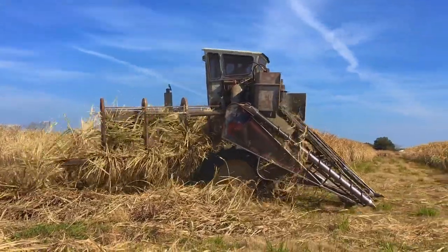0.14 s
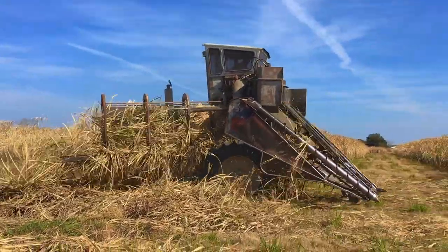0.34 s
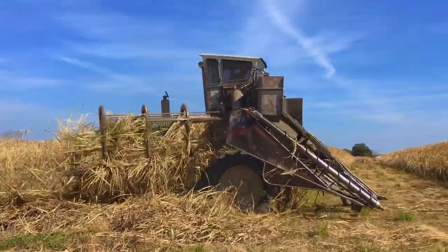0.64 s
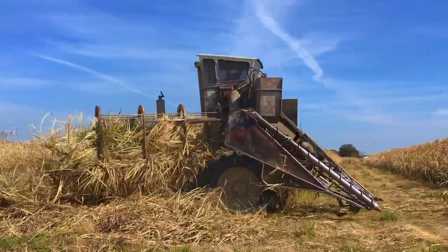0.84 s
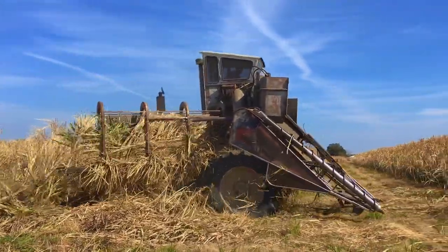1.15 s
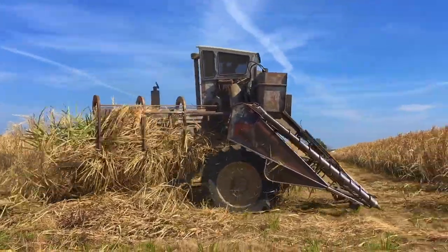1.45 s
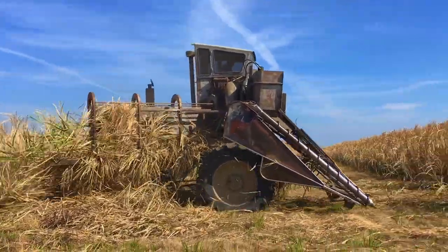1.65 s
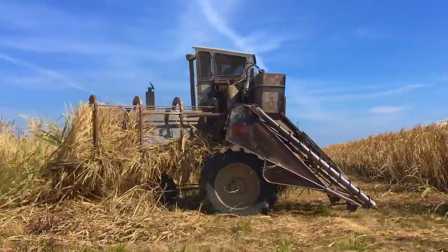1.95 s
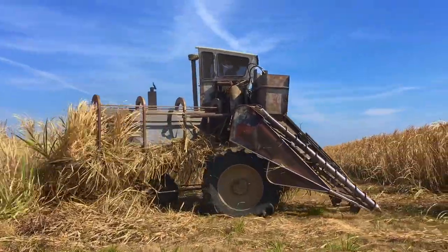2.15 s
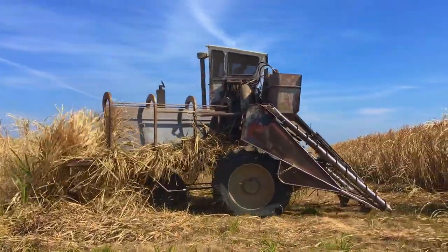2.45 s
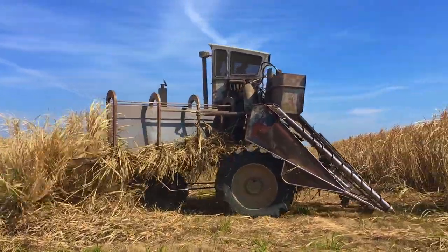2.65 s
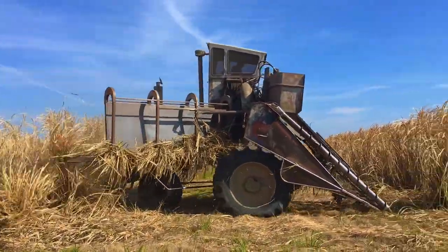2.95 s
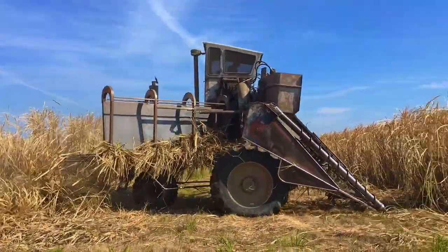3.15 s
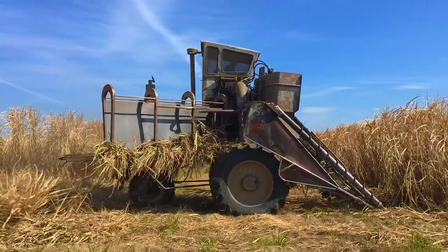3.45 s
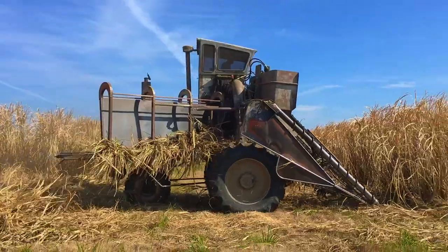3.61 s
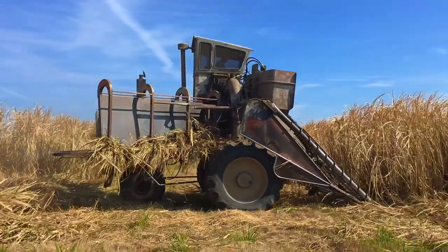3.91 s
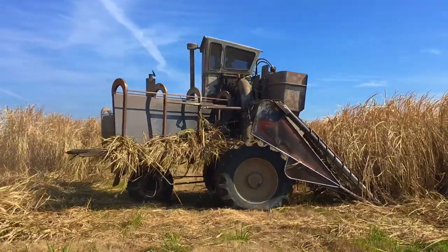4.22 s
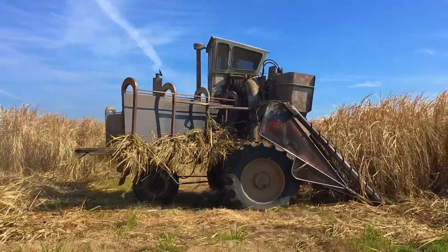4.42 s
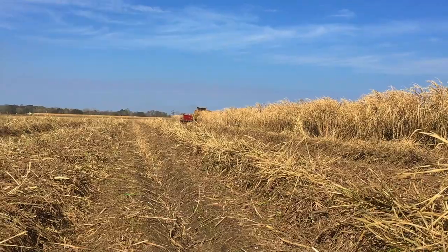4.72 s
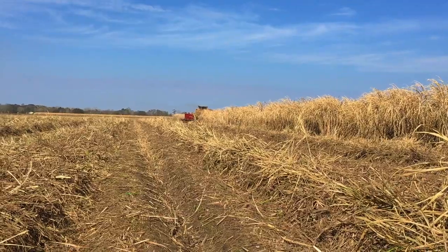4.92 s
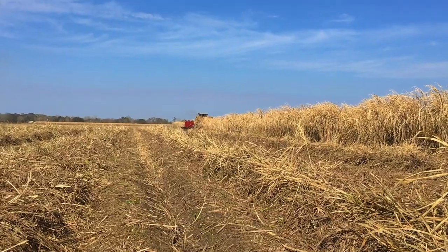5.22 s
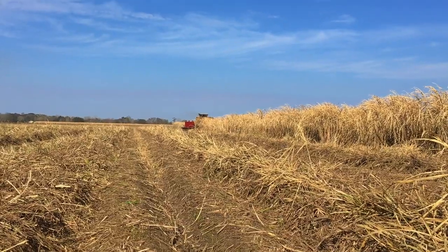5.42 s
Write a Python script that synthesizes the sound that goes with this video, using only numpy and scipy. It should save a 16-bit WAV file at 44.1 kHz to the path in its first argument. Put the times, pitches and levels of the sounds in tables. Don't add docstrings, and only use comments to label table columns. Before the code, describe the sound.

A diesel harvester drones and clatters close by, chains squeaking and slats knocking as dry stalks crush, then abruptly a faint distant machine with wind.

```python
import sys
import numpy as np
from scipy import signal
from scipy.fft import rfft, irfft, next_fast_len
from scipy.io import wavfile
from scipy.ndimage import uniform_filter1d, map_coordinates

SR = 44100
rng = np.random.default_rng(int(sys.argv[2]) if len(sys.argv) > 2 else 0)


def to_wav(s):
    ch = np.atleast_2d(s).T
    pcm = np.round(np.clip(ch, -1, 1) * 32767)
    wavfile.write(sys.argv[1], SR, pcm.astype(np.int16))


def field_ratio(decibels):
    return 10 ** (np.asarray(decibels, dtype=float) / 20)


N = 245637
T = np.arange(N) / SR

CUT_S, RETURN_S, FADE_S = 4.629, 4.663, .014
TOP_HZ = 15740
CYCLE_HZ, FAR_CYCLE_HZ = 16.39, 16.13

# order_per_cycle, level_db
ENGINE_LINES = [(2.46, -48), (4, -41), (16, -49), (18, -48), (22, -45), (24, -44), (44, -54), (48, -53),
                (51, -48), (54, -49.5), (55, -50), (57, -52), (63, -52), (66, -47.5), (99, -54)]
FAR_ENGINE_LINES = [(6, -52), (12, -55), (24, -69), (36, -70), (42, -68), (60, -62), (87.7, -60)]

# pitch_hz, density_db
RUMBLE_COLOUR = [(13, -45), (22, -22), (48, -9.5), (71, -8), (91, -7), (145, 2), (183, -6), (230, -17.5),
                 (300, -43), (510, -120)]
# pitch_hz, density_db
PANEL_COLOUR = [(120, -28), (205, -5.5), (242, -1), (376, -4), (466, -18.5), (520, -17), (680, -39),
                (1140, -120)]
# pitch_hz, density_db
CLATTER_COLOUR = [(250, -9.5), (430, -7), (486, -17.5), (578, -4.5), (753, -3.5), (904, 0.5), (1140, -3),
                  (1430, -4), (1520, -3.5), (2330, -10), (2550, -9.5), (3040, -16.5), (4900, -19),
                  (6370, -21), (10800, -120)]
# pitch_hz, density_db
CROP_COLOUR = [(2180, -3.5), (3700, -1), (4900, -5), (5740, 0), (6490, -1.5), (8480, -1), (9580, -3),
               (10500, -8.5), (12800, -7.5), (15100, -16), (15900, -11)]
# pitch_hz, density_db
WIND_COLOUR = [(13, -39), (22, -12), (32, 1), (54, -1), (161, -11.5), (170, -12), (220, -34), (370, -120)]
# pitch_hz, density_db
FAR_RUMBLE_COLOUR = [(65, -30), (110, -7), (140, -11.5), (199, -2), (290, -15), (376, -14), (520, -24),
                     (680, -55), (1140, -120)]
FAR_CLATTER_COLOUR = [(250, -48), (430, -24), (530, -20), (564, -14), (717, -8.5), (940, -2.5), (1340, -4),
                      (1440, -3), (1490, -3), (1910, -1), (2480, -9.5), (2990, -5.5), (3390, -12),
                      (3720, -6.5), (5200, -29), (6760, -53), (11400, -120)]
FAR_CROP_COLOUR = [(2650, -25), (4500, -1), (5050, -4), (5830, -0.5), (7350, -8), (8750, -7),
                   (10400, -16.5), (11700, -16.5), (15900, -28)]

# time_s, level_db
EXHAUST_REVEAL = [
    (0, -31.5),
    (1.1, -30.5),
    (2.0, -31.5),
    (2.6, -28),
    (3.4, -26),
    (4.2, -23.5),
    (4.63, -25),
]
# time_s, pitch_hz, level_db
DRIVE_WHINE = [
    (0, 1413, -42),
    (.3, 1385, -40),
    (.7, 1354, -40),
    (1, 1360, -49),
]
# centre_s, change_db, half_width_s
OCTAVE_SWELLS = [
    (0, 5, 0.79),
    (1.4, 4, 0.27),
    (3.4, -7, 0.25),
    (4.2, 4, 0.27),
]
# centre_s, change_db, half_width_s
GEAR_SWELLS = [
    (.7, 3, 0.43),
    (1.35, 7.5, .2),
    (1.8, -7, .2),
    (2.2, 6, .2),
    (3.1, 6, 0.46),
    (4.2, 12, 0.35),
]
# centre_s, change_db, half_width_s
PUMP_SWELLS = [
    (1.0, 11, 0.19),
    (1.7, -7, 0.39),
    (2.4, 4.5, 0.24),
    (3.7, 4, 0.58),
]
# centre_s, change_db, half_width_s
LABOUR = [
    (.49, 1.5, .12),
    (1.94, 3.9, 0.56),
    (3.3, 2.2, 0.72),
]
# centre_s, change_db, half_width_s
FEED = [
    (0, 0.75, 0.16),
    (.49, 1.2, 0.11),
    (2.3, 0.78, .2),
    (4.13, 2.2, 0.15),
]

# centre_s, pitch_hz, peak_db, length_s
SQUEAKS = [(.045, 7650, -26.5, .014), (.174, 5860, -34, .018), (.377, 6070, -37, .03),
           (.404, 6130, -31, .012), (.58, 7340, -27, 0.017), (.654, 8100, -30, .023),
           (.773, 9760, -31, .016), (0.777, 6000, -37, 0.01), (.795, 12610, -40.5, .017),
           (1.771, 7360, -36, .014), (1.775, 13000, -36, .014), (3.792, 4630, -30, 0.014),
           (2.526, 7340, -33, .021), (2.552, 5970, -34, .018), (4.623, 13800, -40, .01),
           (3.016, 5820, -25.5, .01), (3.071, 5600, -31, .011), (3.098, 8260, -32, .014),
           (3.182, 6630, -33, .025), (3.501, 5880, -33, .011), (3.522, 7260, -35, .014),
           (3.848, 7300, -33, 0.014), (3.99, 8610, -39, .028), (4.084, 9500, -29, 0.03),
           (4.13, 5610, -27.5, .011), (4.142, 9880, -35, .02), (4.198, 7350, -28.5, .012),
           (4.413, 6460, -36, .036), (4.432, 5770, -32, .014), (4.57, 7570, -32, 0.035)]
# start_s, peak_db, brightness_db_per_octave
KNOCKS = [(.229, -24, -1), (.499, -24, -2), (.773, -18, 1), (1.049, -24, -2), (1.327, -19.5, -1.5),
          (1.588, -21, -3), (1.867, -21, -4), (1.911, -22, -3), (2.134, -21, -2), (2.404, -22, 1),
          (2.479, -23, 4), (2.639, -23, -4), (2.670, -17, -2.5), (2.949, -26, 0), (3.219, -26, 0),
          (3.496, -22, 1), (3.782, -22, 3), (4.069, -24, 0), (4.319, -24, 0), (4.593, -22, 0)]
# pitch_hz, level_db, t60_s
SLAT_MODES = [(2050, -4, .07), (2550, -1, .07), (2850, 0, .08), (3750, -6, .05), (4450, -5, .05),
              (5900, -8, .04), (9300, -12, .03)]
# start_s, peak_db
SNAPS = [(0.7941, -29), (1.6148, -32), (1.7739, -29), (2.0199, -30), (2.4798, -32), (3.1747, -31),
         (3.3139, -29), (3.5359, -31), (3.725, -29), (3.7614, -28), (3.8098, -34), (3.8302, -27),
         (3.9445, -32), (4.5037, -35)]

# centre_s, change_db, half_width_s
FAR_FEED = [
    (4.69, 4, 0.18),
    (5.28, 5.7, 0.044),
    (5.545, 5.3, 0.045),
]
# centre_s, peak_db, pitch_hz
THUMPS = [
    (4.765, -33, 65),
    (4.84, -38, 90),
    (5.372, -36, 48),
]

# centre_s, level_db, low_hz, high_hz
SIDE_HISS = [(0.0, -46.5, 6890, 8268), (0.881, -44, 8268, 9646), (0.954, -45, 6850, 8200),
             (1.138, -41, 4260, 10163), (1.466, -45, 8300, 9750), (1.558, -46, 5140, 13436),
             (1.602, -51, 11714, 14400), (1.881, -44, 8268, 9646), (2.371, -45, 4170, 5167),
             (3.436, -51, 4200, 15331), (3.97, -52, 4700, 13264), (5.457, -68, 4630, 5857)]


def unit(x):
    return x / np.sqrt(np.mean(x ** 2) + 1e-20)


def curves(rows):
    s, *cols = np.transpose(rows)
    return [np.interp(T, s, c) for c in cols]


def swells(rows):
    return sum(db * np.exp(-((T - s) / half_s) ** 2) for s, db, half_s in rows)


def wobble(rate):
    return map_coordinates(rng.standard_normal(int(N * rate / SR) + 4), [T * rate])


def coloured(x, spectrum):
    size = next_fast_len(N + 8192)
    hz, db = np.transpose(spectrum)
    bins = np.log(np.fft.rfftfreq(size, 1 / SR) + 1)
    gain = field_ratio(np.interp(bins, np.log(hz + 1), db))
    return unit(irfft(rfft(x, size) * gain, size)[:N])


def patchy(patchy_db):
    z = signal.stft(rng.standard_normal(N + 512), nperseg=512)[2]
    field = uniform_filter1d(rng.standard_normal(z.shape), 8, 0)
    field = unit(uniform_filter1d(field, 5, 1))
    return unit(signal.istft(z * field_ratio(patchy_db * field), nperseg=512)[1][:N])


def crackle(rate, spread_db, cycles):
    draw = rng.random((int(rate * N / SR), 3))
    t = np.arange(256) / SR
    hz = 600 + 15000 * draw[:, 1:2]
    size = field_ratio(spread_db * np.minimum(-np.log(draw[:, 2:]), 3)) * np.sqrt(hz)
    grain = size * np.exp(-t * hz / cycles) * np.sin(2 * np.pi * hz * t)
    at = (draw[:, :1] * N).astype(int) + np.arange(256)
    return unit(np.bincount(at.ravel(), grain.ravel(), N)[:N])


def tone(phase, order, flutter_db, slip, rate):
    level = np.sqrt(2) * field_ratio(flutter_db * wobble(rate))
    return level * np.sin(order * phase + slip * wobble(rate) + rng.uniform(0, 2 * np.pi))


def firing_gate(phase, uneven_db):
    firing = 6 * phase / (2 * np.pi)
    cylinder = np.array([0.87, -0.41, .3, -1.3, 0.45, 0.26])[firing.astype(int) % 6]
    return field_ratio(uneven_db * cylinder * np.exp(-4 * (firing % 1)))


def engine_tones(phase, fire_db):
    octave_db = -37 + swells(OCTAVE_SWELLS)
    gear_db = -46.5 + swells(GEAR_SWELLS)
    pump_db = -47 + swells(PUMP_SWELLS)
    tones = field_ratio(fire_db) * tone(phase, order=6, flutter_db=.6, slip=.12, rate=12)
    tones += field_ratio(octave_db) * tone(phase, order=12, flutter_db=1.5, slip=.45, rate=18)
    tones += field_ratio(gear_db - 1.5) * tone(phase, order=88, flutter_db=1.5, slip=0.5, rate=20)
    tones += field_ratio(pump_db - 1.0) * tone(phase, order=39.55, flutter_db=3.2, slip=0.46, rate=11)
    tones += field_ratio(pump_db - 2.7) * tone(phase, order=36, flutter_db=0.8, slip=0.44, rate=13)
    drive_hz, drive_db = curves(DRIVE_WHINE)
    drive_db = drive_db - 1.0 - 20 * np.clip(T - .8, 0, 2)
    drive_phase = 2 * np.pi * np.cumsum(drive_hz) / SR
    tones += field_ratio(drive_db) * tone(drive_phase, order=1, flutter_db=-1.0, slip=0.43, rate=21.3)
    for order, db in ENGINE_LINES:
        tones += field_ratio(db + .5) * tone(phase, order, flutter_db=2.5, slip=0.45, rate=8)
    return tones


def harvester():
    phase = 2 * np.pi * CYCLE_HZ * T + 0.019 * wobble(1.994)
    fire_db, = curves(EXHAUST_REVEAL)
    tones = engine_tones(phase, fire_db)
    reveal_db = fire_db + 31
    labour_db, feed_db = swells(LABOUR), swells(FEED)
    rumble_db = -33 + 0.32 * reveal_db + labour_db
    panel_db = -33.5 + 0.13 * reveal_db + 0.54 * labour_db
    clatter_db = -28 + 0.13 * reveal_db + 0.18 * (labour_db + feed_db)
    crop_db = -33.5 - 0.51 * reveal_db + feed_db
    load = field_ratio(0.17 * wobble(22) + 0.45 * wobble(45))
    gate = firing_gate(phase, uneven_db=-1.5)
    rumble = field_ratio(rumble_db + 1.5) * coloured(patchy(patchy_db=-0.26), RUMBLE_COLOUR)
    rumble += field_ratio(panel_db - 1.5) * coloured(patchy(patchy_db=0.0), PANEL_COLOUR)
    rattle = gate * patchy(patchy_db=0.6) + 0.15 * crackle(rate=500, spread_db=2.0, cycles=1.6)
    clatter = field_ratio(clatter_db - 0.61) * unit(load * coloured(rattle, CLATTER_COLOUR))
    crush = gate ** .4 * patchy(patchy_db=1.0) + 0.26 * crackle(rate=700, spread_db=3.5, cycles=13)
    crop = field_ratio(crop_db + 0.96) * unit(load * coloured(crush, CROP_COLOUR))
    return tones + rumble + clatter + crop


def chain():
    out, t = np.zeros(N), np.arange(-SR // 20, SR // 20) / SR
    draw = rng.random((round(5 * CUT_S), 3))
    faint = [(CUT_S * a, 7000 + 8000 * b, -44 - 1.6 * b, .014 * (.7 + c)) for a, b, c in draw]
    for s, hz, db, length in list(SQUEAKS) + faint:
        waver = uniform_filter1d(rng.standard_normal((2, len(t))), 90, 1) * np.sqrt(90)
        swell = np.exp(-(1.9 * t / length) ** 4) * field_ratio(waver[0])
        turn = 2 * np.pi * hz * t * (1 + .15 * t) + .9 * waver[1]
        octave = field_ratio(-15) * (2 * hz < TOP_HZ) * np.sin(2 * turn)
        squeak = field_ratio(db - 2.0) * swell * (np.sin(turn) + octave)
        at = round(s * SR) + np.arange(len(t)) - SR // 20
        out[at[at >= 0]] += squeak[at >= 0]
    return out


def conveyor():
    out, t = np.zeros(N), np.arange(SR // 10) / SR
    for s, db, bright_db in KNOCKS:
        rattle = np.cumsum(.1 * rng.standard_normal((len(SLAT_MODES), len(t))), 1)
        ring = np.zeros(len(t))
        for (hz, level, t60), slip in zip(SLAT_MODES, rattle):
            mode_db = level + bright_db * np.log2(hz / 2800) + rng.normal(0, 0.38)
            ring += field_ratio(mode_db - 60 * t / t60) * np.sin(2 * np.pi * hz * t + slip)
        crack_hz = [1500, 6000 + 900 * bright_db]
        band = signal.butter(2, crack_hz, "band", fs=SR, output="sos")
        crack = field_ratio(-60 * t / .06) * signal.sosfilt(band, rng.standard_normal(len(t)))
        attack = 1 - np.exp(-t / .001)
        out[round(s * SR):][:len(t)] += field_ratio(db - 8) * (ring + 1.7 * crack) * attack
    return out


def stalks():
    out, t = np.zeros(N), np.arange(SR // 50) / SR
    band = signal.butter(2, (10500, 15000), "band", fs=SR, output="sos")
    for s, db in SNAPS:
        puff = signal.sosfilt(band, rng.standard_normal(len(t)))
        out[round(s * SR):][:len(t)] += field_ratio(db + 1.5 - 60 * t / .014) * puff
    return out


def near_gust():
    centre_s, peak_db, pitch_hz, half_s = 1.795, -18, 95, .008
    swell = np.exp(-((T - centre_s) / half_s) ** 2)
    return field_ratio(peak_db) * swell * np.sin(2 * np.pi * pitch_hz * (centre_s - T))


def far_wind():
    level_db = -45.0 - 2.5 * np.maximum(T - RETURN_S, 0)
    wind = field_ratio(level_db) * unit(field_ratio(1.3 * wobble(27)) * coloured(patchy(patchy_db=1.0), WIND_COLOUR))
    for s, db, hz in THUMPS:
        wind += field_ratio(db) * np.exp(-((T - s) / 0.014) ** 2) * np.sin(2 * np.pi * hz * (T - s) + 1.1)
    return wind


def far_harvester():
    phase = 2 * np.pi * FAR_CYCLE_HZ * T
    crop_db = -62 + swells(FAR_FEED)
    machine_db = -46.5 - 6 * np.maximum(T - RETURN_S, 0) + 0.48 * swells(FAR_FEED[1:])
    tones = np.zeros(N)
    for order, db in FAR_ENGINE_LINES:
        tones += field_ratio(db - 2.5) * tone(phase, order, flutter_db=0.8, slip=0.33, rate=15)
    rumble = field_ratio(-54.0) * coloured(patchy(patchy_db=-1.0), FAR_RUMBLE_COLOUR)
    shimmer = field_ratio(0.57 * wobble(25))
    clatter = field_ratio(machine_db + 5.5) * shimmer * coloured(patchy(patchy_db=0.8), FAR_CLATTER_COLOUR)
    crush = patchy(patchy_db=1.5) + 0.18 * crackle(rate=460, spread_db=10, cycles=6)
    crop = field_ratio(crop_db + 6.5) * shimmer * coloured(crush, FAR_CROP_COLOUR)
    return tones + rumble + clatter + crop


def microphone(x):
    hz = np.fft.rfftfreq(N, 1 / SR)
    return irfft(rfft(x) * (hz < TOP_HZ) / np.sqrt(1 + (32 / (hz + 1)) ** 8), N)


def scene():
    near = microphone(harvester() + chain() + conveyor() + stalks() + near_gust())
    near *= np.clip((CUT_S + .001 - T) / .0025, 0, 1)
    far = microphone(far_harvester() + far_wind())
    far *= np.clip((T - RETURN_S) / FADE_S, 0, 1)
    mono = near + far
    return np.array([mono, mono])


def roll_off(x):
    return signal.sosfilt(signal.butter(12, 16990, fs=SR, output="sos"), x)


def record(dry):
    hz, side = np.fft.rfftfreq(N, 1 / SR), np.zeros(N)
    half_s = 1024 / SR
    for s, db, low_hz, high_hz in SIDE_HISS:
        tilt = (hz > low_hz) * (hz < high_hz) * low_hz / (hz + 1)
        hiss = unit(irfft(rfft(rng.standard_normal(N)) * tilt, N))
        side += field_ratio(db + 0.5) * hiss * np.cos(np.pi / 2 * np.clip((T - s) / half_s, -1, 1))
    return roll_off(dry + np.array([side, -side]))


dry = scene()
out = record(dry)
to_wav(out)
```